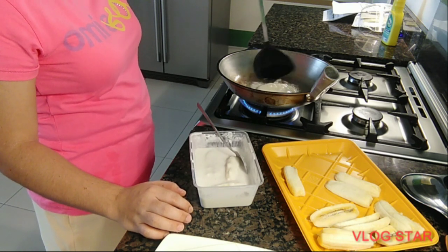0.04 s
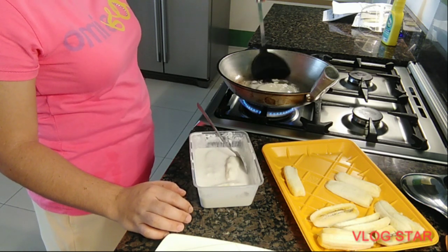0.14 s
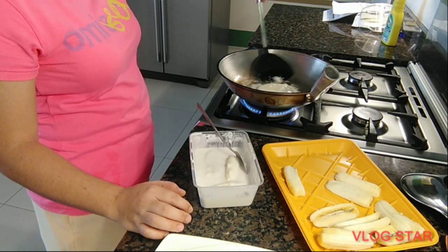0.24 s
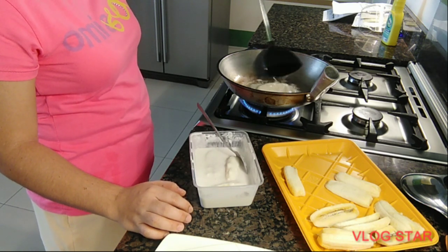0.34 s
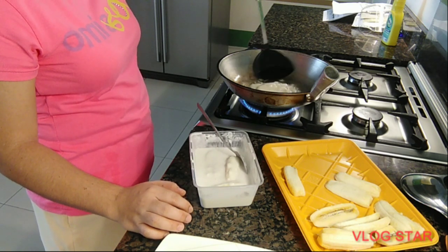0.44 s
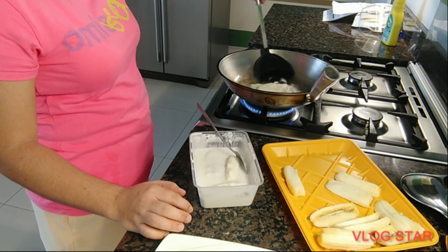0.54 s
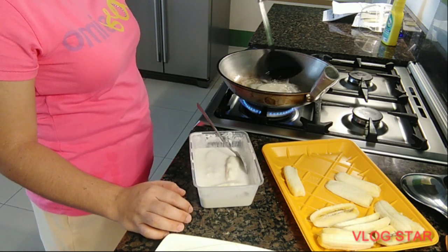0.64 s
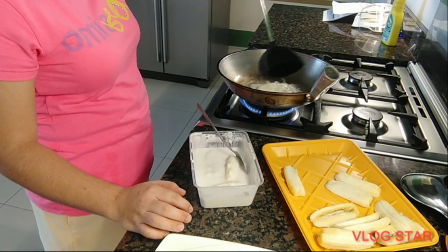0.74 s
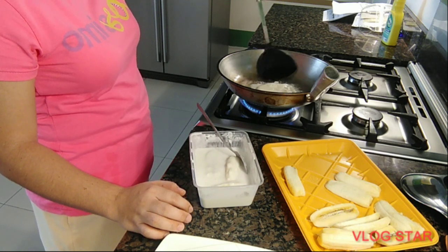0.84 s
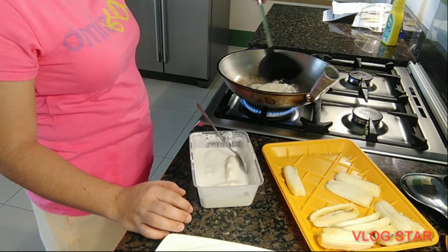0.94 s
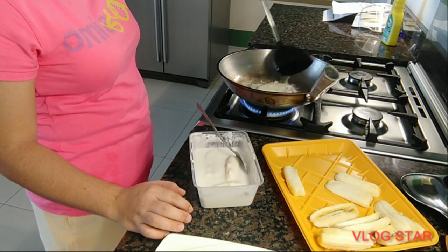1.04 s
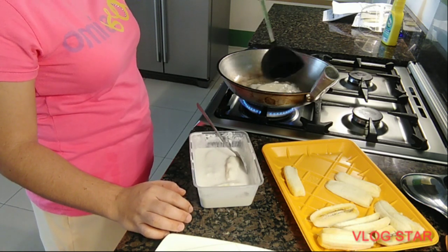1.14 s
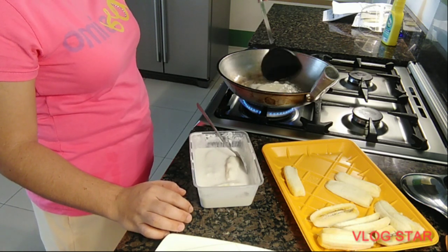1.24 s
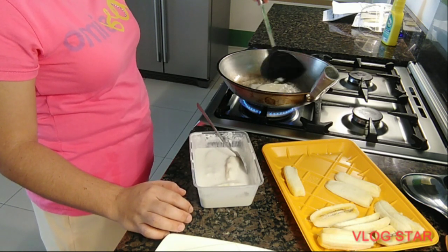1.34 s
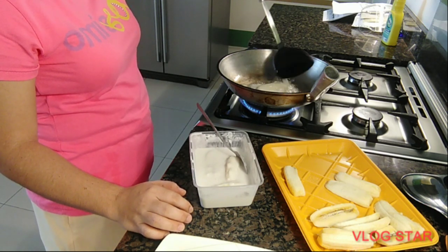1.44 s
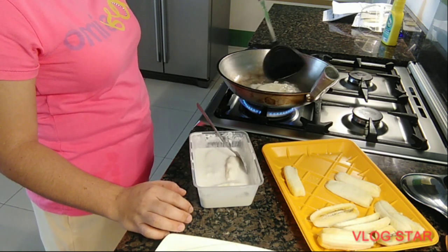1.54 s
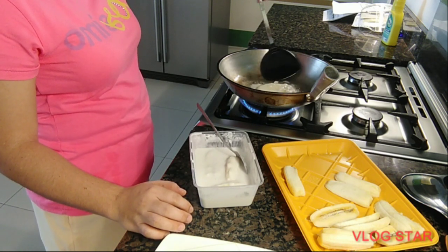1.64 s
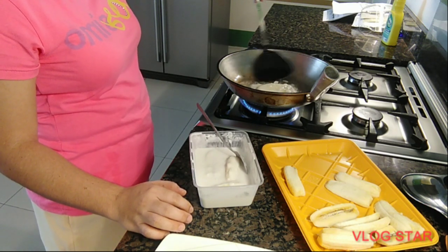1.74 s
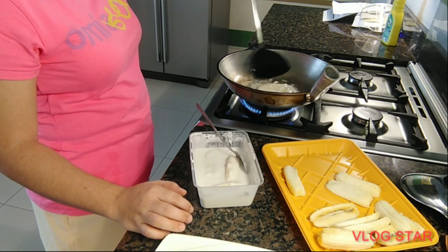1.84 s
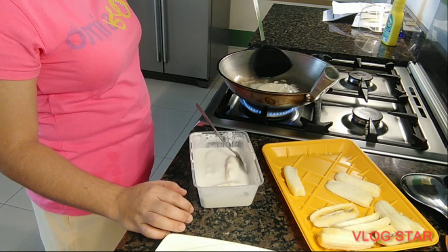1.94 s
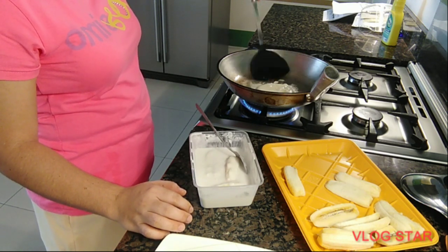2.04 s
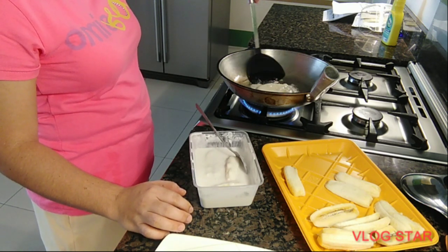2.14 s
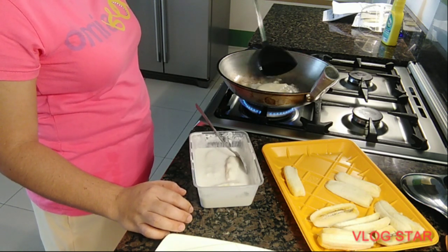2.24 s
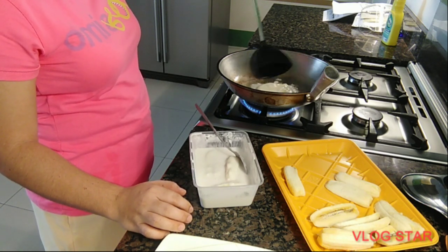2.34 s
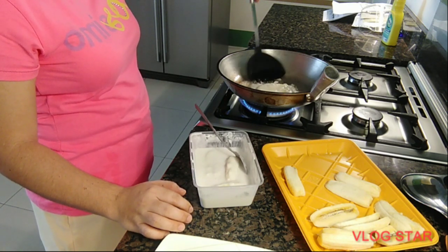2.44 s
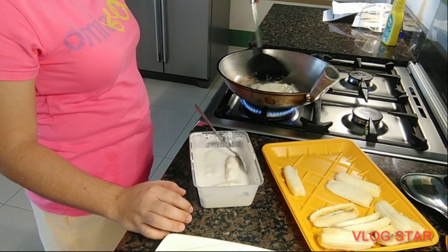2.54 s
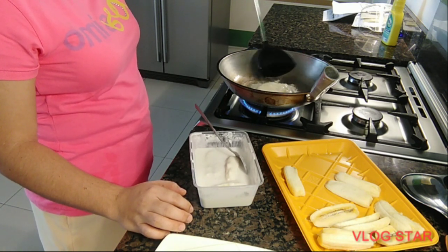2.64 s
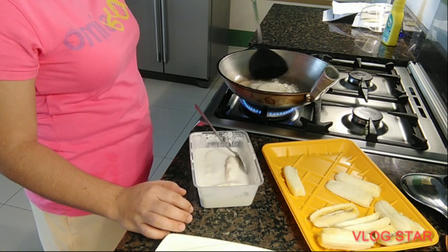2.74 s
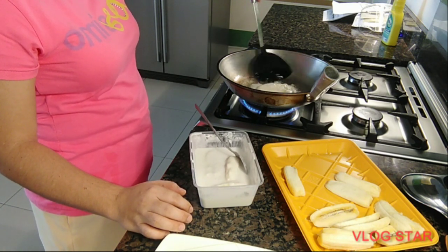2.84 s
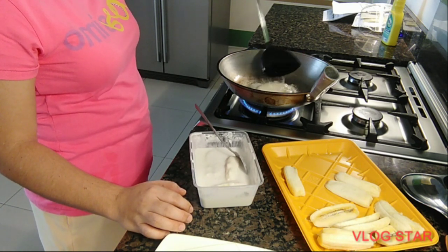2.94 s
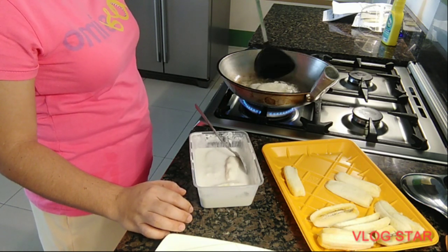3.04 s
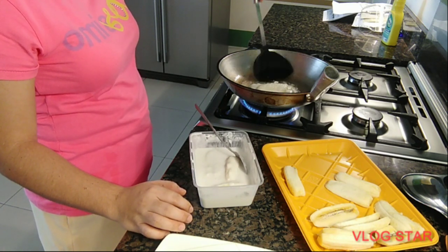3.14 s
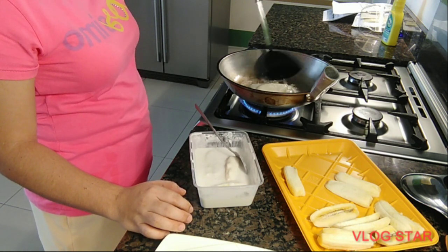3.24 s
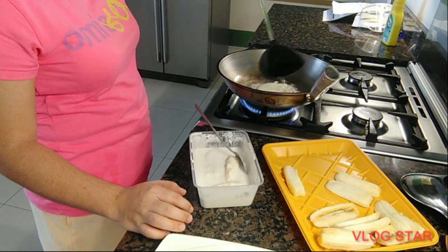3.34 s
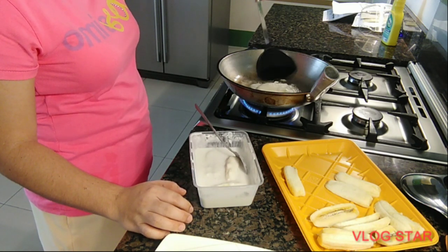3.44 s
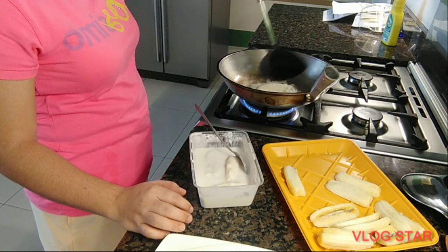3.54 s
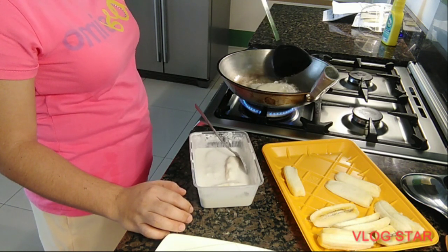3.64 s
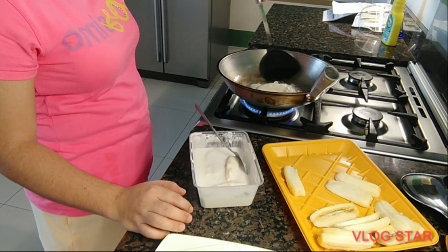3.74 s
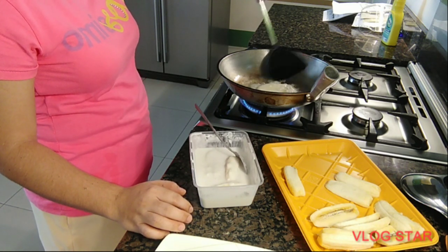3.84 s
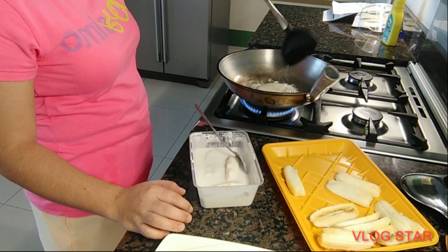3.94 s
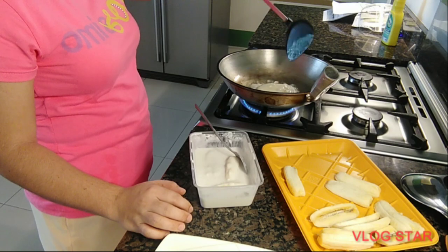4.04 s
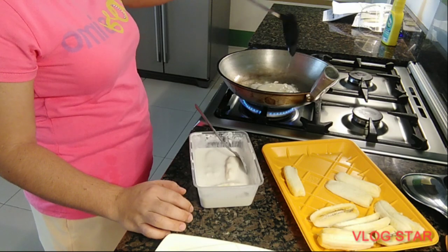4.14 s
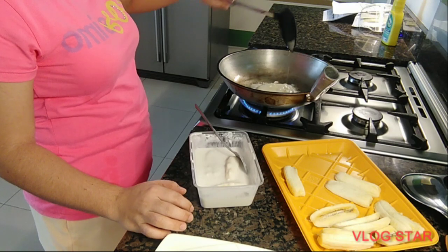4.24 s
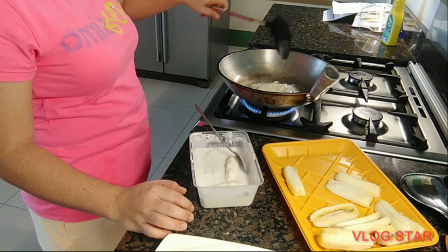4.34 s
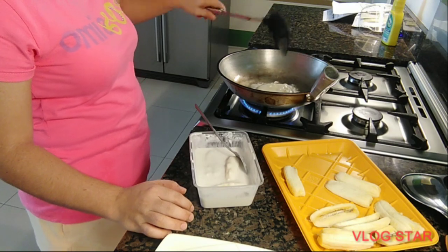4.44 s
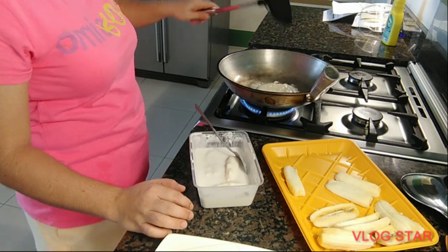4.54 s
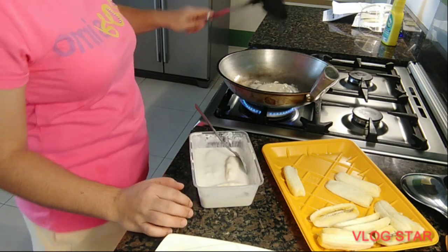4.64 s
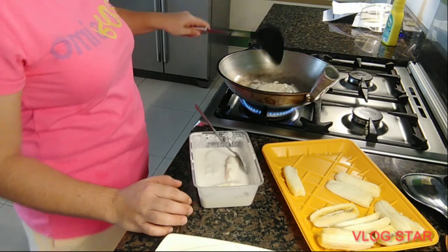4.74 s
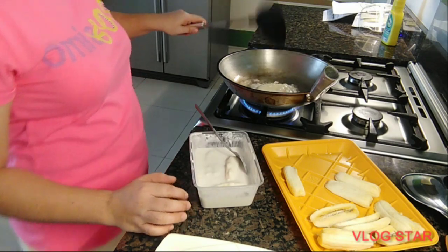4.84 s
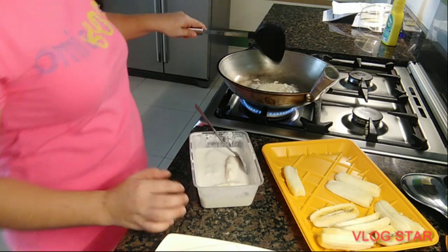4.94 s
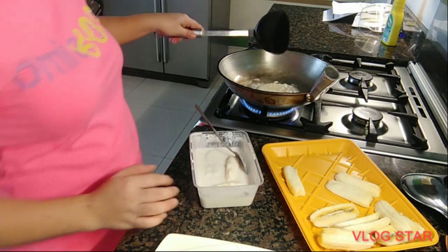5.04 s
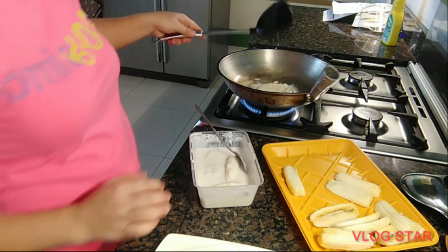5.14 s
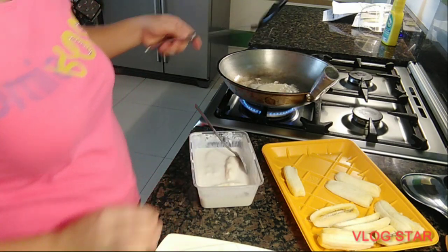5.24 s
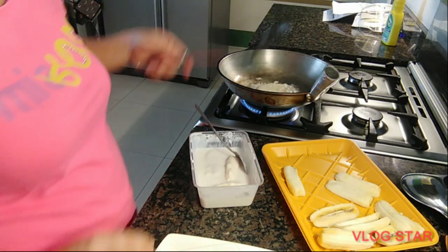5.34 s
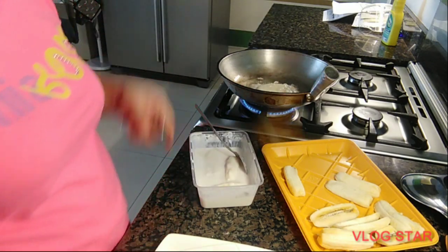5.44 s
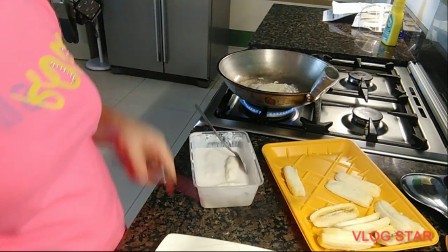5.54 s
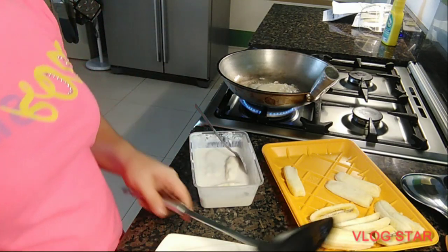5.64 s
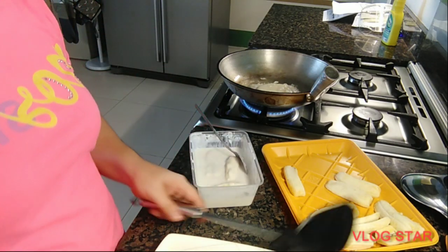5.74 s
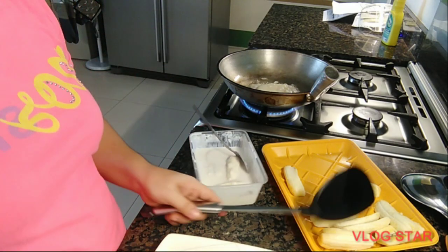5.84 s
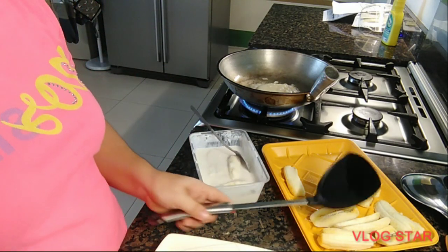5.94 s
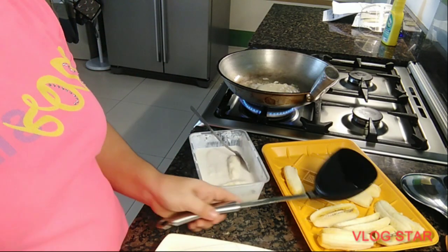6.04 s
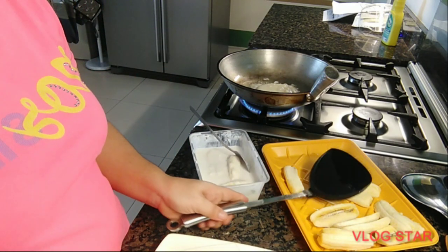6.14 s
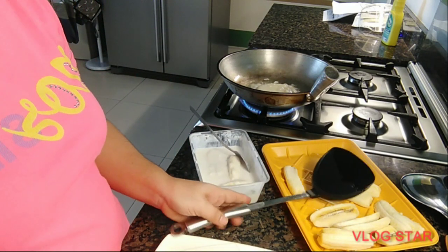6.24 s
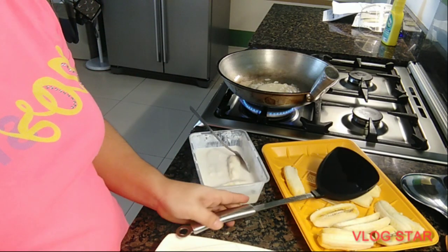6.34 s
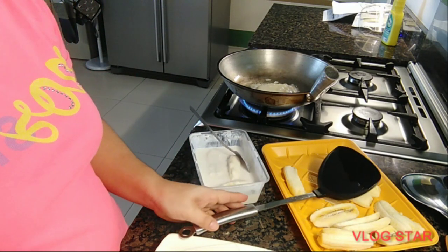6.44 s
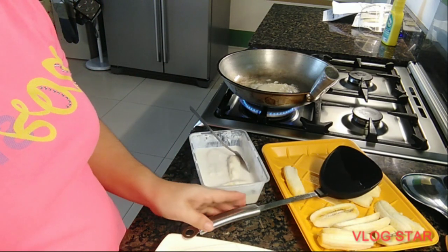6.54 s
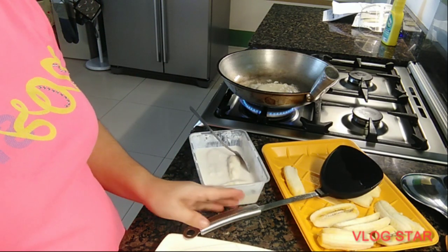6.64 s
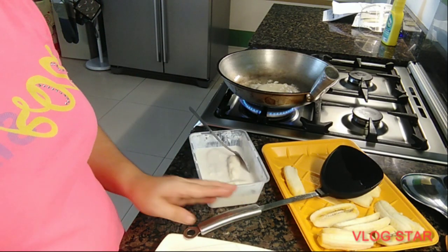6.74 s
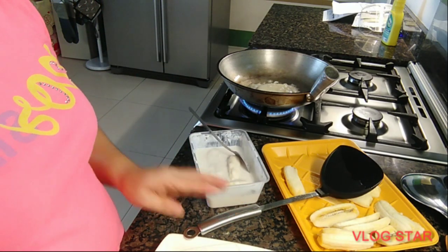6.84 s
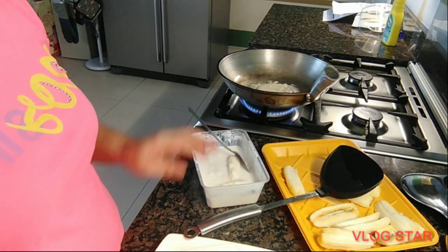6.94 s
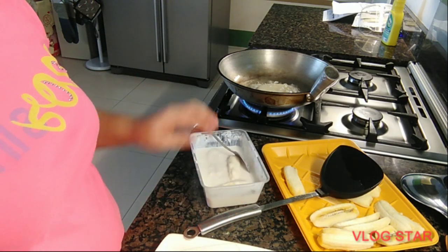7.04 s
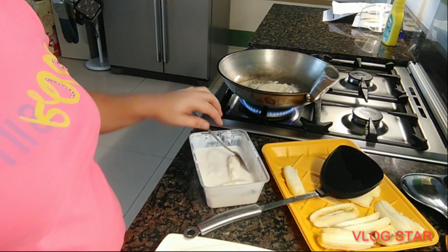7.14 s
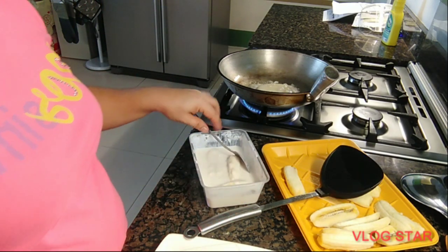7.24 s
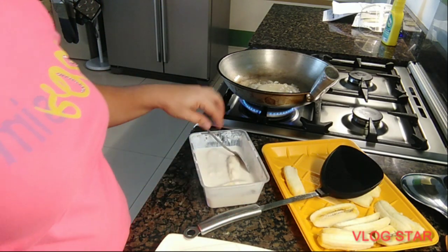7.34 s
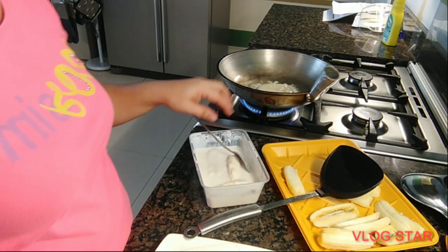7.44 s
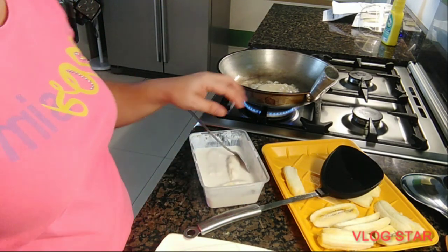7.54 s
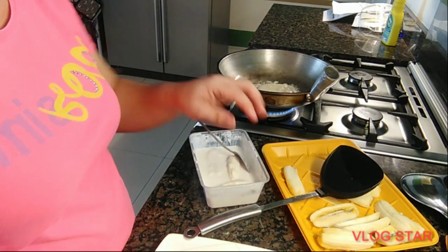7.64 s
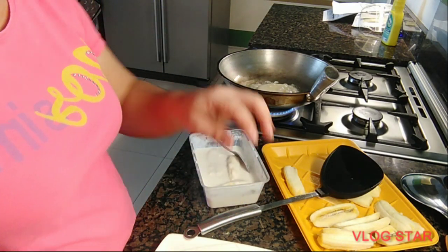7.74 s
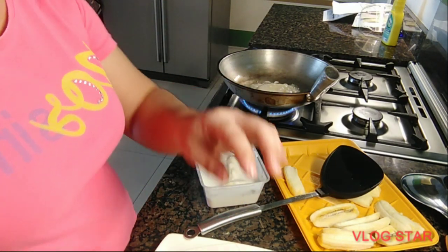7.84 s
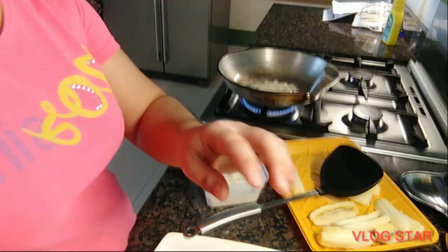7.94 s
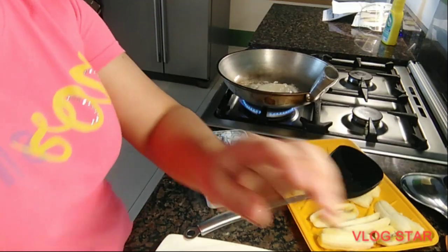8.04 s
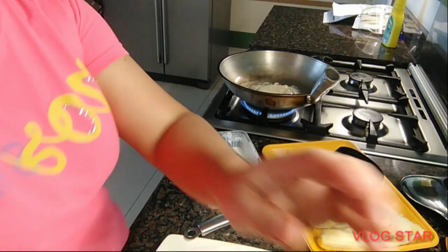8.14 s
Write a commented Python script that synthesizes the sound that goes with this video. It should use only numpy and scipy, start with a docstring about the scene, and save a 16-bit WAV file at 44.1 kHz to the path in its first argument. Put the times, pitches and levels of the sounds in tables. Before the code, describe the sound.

One microphone in a small, hard-surfaced kitchen hears battered food frying in a wok. From 0 to about 1.2 seconds bright, dense sizzling surges in quick splashes, strongest near 0.2 and 0.6, with coarse bubbling and a light wok tap at 0.3. Until 2.3 the sizzle is steadier, dotted with short, pitched bubble pops, a sharp one near 1.9, and dry snaps. A fresh surge comes at 2.4, then steel knocks with a brief scrape at 2.6 and a stronger ringing knock at 2.95. After 4 seconds the frying falls to a thinner, calmer hiss with sparse pops and snaps. At 6.3 a metal handle lightly touches stone, then clatters loudly and closely in rapid bounces from 6.45 to 6.6, ringing briefly. The sizzle continues, rising slightly towards a faint last knock at 8.1. Soft gurgling, a fluttering flame and low electrical hum lie beneath.

```python
"""Battered fritters fry in a wok on a gas burner in a small tiled kitchen, heard by one microphone.
From the start, random steam bursts make the sizzle, which surges in splashes as a spatula bastes the food;
large bubbles ring as damped cavities, water drops snap, and struck wok modes ring under the spatula until 3 s.
The frying then calms; after 6 s the spatula is laid down and its steel handle bounces on the stone counter.
Near the end comes a last faint knock. Gurgling, a fluttering gas flame and a steady mains hum lie below."""
import sys
import numpy as np
from scipy import signal
from scipy.fft import rfft, irfft
from scipy.io import wavfile
from scipy.ndimage import uniform_filter1d

SR = 44100
rng = np.random.default_rng(int(sys.argv[2]) if len(sys.argv) > 2 else 0)


def digitize_waveform(pressure):
    """Quantize a signal to 16-bit integers and store it at the path in sys.argv[1].

    Rows of a 2-D input are taken as channels; values are limited to [-1, 1].
    """
    field = np.atleast_2d(pressure).T
    bounded = np.clip(field, -1, 1)
    quanta = np.round(bounded * 32767).astype(np.int16)
    wavfile.write(sys.argv[1], SR, quanta)


N = 361619
TIME = np.arange(N) / SR
SHOT = TIME[:2 * SR // 3]  # time within one blow, s

# spectrum of the fine sizzle, also of the spit from a bursting bubble: f/Hz, relative level/dB
SIZZLE_COLOUR = [(600, -32), (1950, -33.5), (2200, -11), (2650, -4.5), (3600, -4.5), (4500, 0), (5500, -3),
                 (6800, -3), (8100, 4.5), (9000, -1), (10000, -8), (12300, -15.5), (14000, -20.5),
                 (16000, -25)]
# spectrum of the coarse bubbling: f/Hz, relative level/dB
BUBBLING_COLOUR = [(60, -25), (250, -24), (450, -15.5), (980, -18), (1250, 0), (1600, 12), (2400, 2.5),
                   (4000, 4), (7000, -11.5), (14000, -43)]


def frying(spray_db=-28.5):
    """Shot noise: steam bursts at random instants fuse into a hiss, coarser ones into bubbling."""
    fine_db, coarse_db = activity()
    surge_db = fine_db - np.mean(fine_db)

    fizz_clicks = bursts(per_s=4000, spread_db=4.5)
    fizz = colour(over_the_oil(fizz_clicks, count=5), SIZZLE_COLOUR)
    fizz_db = fine_db + 0.16 * walk(14)

    # hot oil running over wet batter adds a finer, brighter spray
    spray_clicks = bursts(per_s=3300, spread_db=0.5)
    spray = colour(spray_clicks, [(1500, -39), (3000, -1), (9500, 16.5), (16000, -16)])
    spray_level_db = fine_db + 0.85 * surge_db + spray_db

    bubbling_clicks = bursts(per_s=1500, spread_db=4.0)
    bubbling = colour(over_the_oil(bubbling_clicks, count=2), BUBBLING_COLOUR)
    bubbling_db = coarse_db + 1.6 * walk(16)

    return (level(fizz) * undb(fizz_db)
            + level(spray) * undb(spray_level_db)
            + level(bubbling) * undb(bubbling_db))


# slow course of the frying, before gain: t/s, sizzle level/dB, coarse bubbling level/dB
FRYING = [(0.0, -43, -55.5), (1.5, -45.5, -57), (2.07, -45.5, -70.5), (2.35, -43.7, -56.5),
          (2.85, -41, -52), (3.45, -44, -59), (3.95, -44, -70.5), (4.35, -48.5, -72), (5.1, -49, -79.5),
          (6.15, -48.5, -75), (7.1, -48.5, -73), (7.7, -48, -69), (8.19, -47, -62.5)]
# hot oil washes over the batter: t of the crest/s, sizzle level/dB, coarse bubbling level/dB
SPLASHES = [(0.19, -37.5, -57), (0.34, -49, -49.5), (0.56, -36, -47.5), (0.89, -43, -54), (1.05, -50, -45),
            (2.42, -35, -51.5), (5.46, -47.5, -85)]


def activity(sizzle_db=0.28, bubbling_db=1, rise_s=0.063, fall_s=0.11):
    """Power addition: each splash's surge adds its energy to the slow course; returns two levels in dB."""
    s, fine, coarse = np.transpose(FRYING)
    fine = undb(np.interp(TIME, s, fine) + sizzle_db)
    coarse = undb(np.interp(TIME, s, coarse) + bubbling_db)
    for crest_s, fine_db, coarse_db in SPLASHES:
        age = TIME - crest_s
        # the surge swells, then dies away as the water boils off
        surge = np.exp(-np.where(age < 0, (age / rise_s) ** 2, age / fall_s))
        fine = np.hypot(fine, undb(fine_db) * surge)
        coarse = np.hypot(coarse, undb(coarse_db) * surge)
    return 20 * np.log10(fine), 20 * np.log10(coarse)


# big steam bubbles: t/s, onset level before gain/dB, f/Hz, ringing/cycles to -60 dB (at least 2),
# spit level relative to the cavity/dB
POPS = [(.0074, -25.5, 7400, 29, -25), (0.669, -32, 2240, 6, -15), (0.8107, -19, 3510, 14, -17),
        (1.023, -28.5, 1630, 24, -6), (1.2365, -30, 7800, 34, -21), (1.2637, -26.5, 5130, 23, -2),
        (1.4392, -29.5, 1700, 10, -12), (1.549, -25.5, 3560, 4.3, -32), (1.6522, -18.5, 4140, 30, -11),
        (1.677, -22, 8500, 14, 5), (1.761, -21.5, 5080, 11, -19), (1.806, -33, 2200, 12, -26),
        (1.852, -23, 8600, 10, -10), (1.8856, -13, 4300, 37, -3.5), (2.2, -32, 2080, 8, -15),
        (2.3696, -23.5, 8500, 12, -14), (2.629, -20, 4340, 9.7, -18), (2.793, -20, 2800, 16, -32),
        (2.9027, -19.5, 4400, 9, -15), (3.271, -28.5, 6080, 29, 2), (3.6158, -32, 2140, 9.3, -30),
        (4.0763, -28.5, 7300, 14, -1), (4.144, -24.5, 5370, 21, -10), (5.843, -24, 6140, 28, -18),
        (5.9628, -24, 7970, 68, -29), (8.1721, -23.5, 6060, 18, -6)]


def pops(gain_db=-9):
    """Cavity resonance: big bursting bubbles stand out of the sizzle with a pitch."""
    out = np.zeros(N)
    for s, db, hz, cycles, spit_db in POPS:
        add(out, s, struck(pop(hz, cycles, spit_db), db + gain_db))
    return out


def pop(hz, cycles, spit_db, overtone=1.76, overtone_db=-17.5, tail_db=-16, tail_t60_s=0.05):
    """Damped resonance: a bursting bubble rings its cavity for a few cycles and throws a spit of oil."""
    phase = 2 * np.pi * hz * SHOT
    # the second resonance lies an inharmonic ratio above the first
    tones = np.sin(phase) + undb(overtone_db) * np.sin(overtone * phase)
    cavity = unit(fade(max(cycles, 2) / hz) * tones)
    tail = undb(tail_db) * unit(fade(tail_t60_s) * np.sin(phase))  # the pitch lingers faintly
    spit = unit(colour(noise_burst(t60=0.012), SIZZLE_COLOUR))
    burst = cavity + tail + undb(spit_db) * spit
    # so small an opening radiates little bass
    radiation = [(600, -38.5), (1500, -7.0), (3000, 7.0), (9000, 9.5), (12000, -1.5)]
    return kitchen(colour(burst, radiation))


def small_pops(high_db=-3.5, low_db=3.0, scatter_db=7.0, cycles=16, spit_db=-18, count=30):
    """Random cavity resonances: high bubbles follow the sizzle's level, low ones the bubbling's."""
    lowest_hz, highest_hz = 1500, 8000
    fine_db, coarse_db = activity()
    out = np.zeros(N)
    for when, height, size in rng.random((count, 3)):
        i = int(when * N)
        hz = lowest_hz * (highest_hz / lowest_hz) ** height
        db = height * (fine_db[i] + high_db) + (1 - height) * (coarse_db[i] + low_db)
        db = db + scatter_db * (2 * size - 1)
        add(out, TIME[i], struck(pop(hz, cycles, spit_db), db))
    return out


# water drops in the oil: t/s, onset level before gain/dB, treble tilt/(dB per octave)
SPITS = [(0.375, -21, 6), (0.9932, -20.5, -4), (2.0325, -24, 2), (2.2317, -20, 4), (2.3442, -25, 11),
         (4.689, -29, 1), (5.638, -25.5, 5.5), (5.783, -24.5, 10), (7.5462, -24.5, 1), (7.556, -25, 10),
         (7.644, -23, 8)]


def spits(gain_db=-13.5):
    """Impulsive radiation: water drops flash to steam with a dry snap."""
    snap_colour = [(20, -71), (400, -30), (1300, -24), (2800, 9.0), (8500, 11.5), (11000, -2.0), (16000, -22)]
    out = np.zeros(N)
    for s, db, tilt_db in SPITS:
        snap = colour(blow(t60=0.017, click_db=4.0), snap_colour, tilt_db)
        add(out, s, struck(kitchen(snap, wet_db=2.5), db + gain_db))
    return out


# spatula on the wok: t/s, onset level before gain/dB, ring level before ring gain/dB,
# treble tilt/(dB per octave), contact t60/s (short for a tap, long for a scrape)
KNOCKS = [(0.2785, -18, -12, -2, 0.051), (2.594, -10, -12, 0.2, 0.028), (2.626, -22, -15, 3.5, 0.37),
          (2.947, -8.5, -0.5, -3, 0.029), (8.090, -25, -23, 0.75, 0.052)]
# natural modes of the wok's steel: f/Hz, mean relative level/dB, t60/s
WOK_MODES = [(289, -5, 0.59), (402, -8.5, 0.95), (463, -14, 1), (543, -11, 1.0), (780, -20, 0.42),
             (1006, -8.5, 0.37), (1226, 0.5, 0.31), (1570, -6, 0.99), (1620, 12, 0.3), (1680, -5.5, 0.34),
             (1860, -7, 0.91), (2196, -0.5, 0.82), (2370, -4.5, 0.75), (3070, -17, 0.45), (3620, 3, 0.3),
             (3650, -5, 0.2), (4269, -1, .4), (4740, -4, 0.2), (4820, 2, .45), (5346, -3, .45),
             (7030, -6, 0.35)]
# spectrum of the contact: f/Hz, relative level/dB
KNOCK_COLOUR = [(30, -57), (100, -13), (300, -10.5), (850, -15.5), (1280, 8.5), (2100, 0), (4000, 3),
                (8000, 6.5), (11000, -11.5), (16000, -42)]


def knocks(gain_db=-11.5, ring_db=0.5):
    """Modal excitation: the spatula cracks or scrapes against the wok, whose steel rings on."""
    out = np.zeros(N)
    for s, db, steel_db, tilt_db, contact_s in KNOCKS:
        contact = blow(t60=contact_s, click_db=-13.5)
        crack = unit(colour(kitchen(contact) + 0.65 * contact, KNOCK_COLOUR, tilt_db))
        steel = undb(ring_db + steel_db) * ring(WOK_MODES, scatter_db=3.5)
        add(out, s, struck(crack + steel, db + gain_db))
    return out


# steel handle on the counter: t/s, onset level before gain/dB, treble tilt/(dB per octave),
# ring level relative to the crack/dB
CLATTER = [(6.3288, -15.5, 0, -34), (6.357, -28.5, 5, -28), (6.4071, -20.5, -0.5, -28),
           (6.4474, -2.5, 0, -7.5), (6.479, -10.5, -1.5, -18.5), (6.5176, -3, 0, -11.5),
           (6.548, -11.5, -0.5, -7.5), (6.581, -1.5, 1.5, -3.5), (6.618, -6.5, -.7, -16)]
# natural modes of the spatula's handle and blade: f/Hz, mean relative level/dB, t60/s
HANDLE_MODES = [(285, -9.5, 0.3), (335, -12, 0.25), (816, -9.5, 0.35), (913, -0.5, 0.33), (944, 3, 0.24),
                (1580, -17, .28), (1680, -26, 0.27), (2206, -5, 0.26), (2554, -7.5, 0.4),
                (2690, -10.5, 0.31), (3560, -15, 0.42), (3670, -5, 0.2), (5300, -16, 0.13),
                (5750, -18, 0.34), (7800, -17.5, .35), (8400, -11.5, 0.29)]
# spectrum of the contact: f/Hz, relative level/dB
CLATTER_COLOUR = [(30, -63), (140, -46.5), (290, -10.5), (430, -9), (680, -14.5), (960, 2), (1120, -7),
                  (1430, 1.5), (1950, -6.5), (2550, -1.5), (3200, -5.5), (4700, -4.5), (8000, -4),
                  (10500, -17.5), (16000, -33.5)]


def clatter(gain_db=-10.0, direct_db=2):
    """Repeated impact: the handle touches the stone, drops and bounces; strong direct sound puts it close."""
    out = np.zeros(N)
    for s, db, tilt_db, ring_db in CLATTER:
        contact = blow(t60=0.033, click_db=-11.0)
        near_contact = kitchen(contact, wet_db=-3.5) + undb(direct_db) * contact
        crack = unit(colour(near_contact, CLATTER_COLOUR, tilt_db))
        handle = undb(ring_db) * ring(HANDLE_MODES, scatter_db=1.5)
        add(out, s, struck(crack + handle, db + gain_db))
    return out


# large slow bubbles in the wok, by band: centre f/Hz, spread of f/Hz, rms level before stirring/dB
GURGLE = [(428.6, 90, -79.5), (638, 44.4, -69), (1282.3, 48.3, -64)]


def gurgle(follow=0.47, scatter_db=4.0, cluster_db=3.5, count=400):
    """Random superposition: overlapping large bubbles blur into a burble, louder while the oil is stirred."""
    _, coarse_db = activity()
    stir = undb(follow * (coarse_db - np.mean(coarse_db)))
    total = 0
    for hz, spread_hz, db in GURGLE:
        out = np.zeros(N)
        for k, (when, pitch, size, length) in enumerate(rng.standard_normal((count, 4))):
            bubble = blip(hz + spread_hz * pitch, .028 * 2 ** (length / 3), glide=.02)
            add(out, (k + when) / count * TIME[-1], bubble * undb(scatter_db * size))
        clusters = undb(cluster_db * walk(9))
        total = total + level(out * clusters, db)
    # the room colours the burble without changing its level
    return stir * level(kitchen(total, wet_db=-6.5)) * np.std(total)


# soft hollow bumps around the stove: t/s, peak level before the wobble/dB, f/Hz
BUMPS = [(2.631, -41, 296), (2.695, -46.5, 280), (2.795, -48, 294), (2.96, -48.5, 109), (3.36, -60, 113),
         (5.79, -59, 120)]


def bumps(wobble_db=5.5, cycles=24):
    """Amplitude modulation: dull bumps wobble and have no sharp edge; lower ones last longer."""
    out = np.zeros(N)
    for s, db, hz in BUMPS:
        add(out, s, undb(db) * blip(hz, cycles / hz))
    return out * undb(wobble_db * walk(70))


# mains hum: f/Hz, rms level/dB
HUM = [(59, -68), (118, -78)]
# spectrum of the gas flame: f/Hz, relative level/dB
FLAME_COLOUR = [(20, -28), (42, -8), (100, -1), (170, -13), (290, -3.5), (450, -21), (900, -11),
                (1700, -28), (4000, -29)]


def background(flame_db=-70):
    """Broadband noise and steady tones: the gas flame flutters softly over a mains hum."""
    flame = level(colour(rng.standard_normal(N), FLAME_COLOUR), flame_db)
    flutter = undb(2.0 * walk(9))
    hum = sum(level(np.sin(2 * np.pi * hz * TIME), db) for hz, db in HUM)
    return flame * flutter + hum


def kitchen(x, wet_db=0):
    """Room response: direct sound, a cluster of echoes from wok, hob and counter, then the tiled room."""
    near_t60_s, near_db = 0.077, 8.5
    room_t60_s, tail_db = 0.62, 3.5
    near = unit(noise_burst(near_t60_s) * (SHOT > .0008))
    build_up = 1 - np.exp(-SHOT / 0.013)
    tail_colour = [(300, 6), (4500, 3), (9000, -0.5), (16000, -0.5)]
    tail = colour(noise_burst(room_t60_s) * build_up, tail_colour)
    response = undb(near_db) * near + undb(tail_db + wet_db) * tail
    return x + signal.fftconvolve(x, response)[:len(x)]


def over_the_oil(clicks, count=8):
    """Spatial spread: each burst comes from one of several spots in the wok, each with its own echoes."""
    spot = rng.integers(count, size=N)
    return sum(kitchen(clicks * (spot == k)) for k in range(count))


def ring(modes, scatter_db, split_hz=9):
    """Modal beating: modes ring in close pairs; every blow shares its energy a little differently."""
    out = 0
    for hz, db, t60 in modes:
        size, split, side = rng.standard_normal(3)
        first = np.cos(2 * np.pi * hz * SHOT)
        second = 0.62 * np.sin(2 * np.pi * (hz + split_hz * split) * SHOT)
        gain = np.sign(side) * undb(db + scatter_db * size)
        out = out + gain * fade(t60) * (first + second)
    return unit(out)


def blow(t60, click_db):
    """Contact excitation: one hard click, then a brief crunch."""
    return unit(noise_burst(t60) + undb(click_db) * (SHOT == 0))


def blip(hz, length_s, glide=0.063):
    """Frequency glide: a soft tone swells, rises a little in pitch and dies."""
    t = np.arange(int(length_s * SR)) / SR
    age = t / length_s
    envelope = np.sin(np.pi * age ** 0.59) ** 2
    return envelope * np.sin(2 * np.pi * hz * t * (1 + glide * (age - 1) / 2))


def bursts(per_s, spread_db):
    """Poisson-like process: clicks at random instants, many small and a few large, at unit rms."""
    chance = rng.random(N)
    size = np.minimum(rng.exponential(size=N), 5)
    return level((chance < per_s / SR) * undb(spread_db * size))


def walk(rate):
    """Smoothed random process: a slow wander with a spread near 1; rate in steps per second."""
    k = int(SR / rate)
    steps = np.repeat(rng.standard_normal(N // k + 1), k)
    return level(uniform_filter1d(steps, k)[:N])


def noise_burst(t60):
    """Decaying noise of unit energy."""
    return unit(rng.standard_normal(len(SHOT)) * fade(t60))


def fade(t60):
    """Exponential decay: the level of one blow falls 60 dB in t60 seconds."""
    return np.exp(-np.log(1000) * SHOT / t60)


def colour(x, points, tilt_db=0, size=4096):
    """Minimum-phase filtering through (f/Hz, level/dB) points, tilted per octave above 500 Hz."""
    hz, db = np.transpose(points)
    octave = np.log2(np.maximum(np.fft.rfftfreq(size, 1 / SR), 1))
    tilt = tilt_db * np.maximum(octave - np.log2(500), 0)
    gain = undb(np.interp(octave, np.log2(hz), db) + tilt)
    # folding the cepstrum onto positive times makes the filter causal
    cepstrum = irfft(np.log(gain))
    cepstrum[1:size // 2] *= 2
    cepstrum[size // 2 + 1:] = 0
    return signal.oaconvolve(x, irfft(np.exp(rfft(cepstrum))))[:len(x)]


def struck(sound, db, size=512):
    """Onset level: scale a blow so that its first milliseconds have this rms level."""
    return sound * undb(db) / np.std(sound[:size])


def undb(db):
    """Logarithmic scale: decibels to amplitude gain."""
    return 10 ** (np.asarray(db) / 20)


def level(x, db=0):
    """Effective value: set the rms level."""
    return x * undb(db) / np.sqrt(np.mean(x ** 2))


def unit(x):
    """Energy normalisation: scale to a unit sum of squares."""
    return x / np.sqrt(np.sum(x ** 2))


def add(out, s, sound):
    """Superposition: mix in a sound that starts at s seconds."""
    i = int(np.clip(s * SR, 0, N - 1))
    out[i:i + len(sound)] += sound[:N - i]


def scene():
    """Superposition of all sources at one microphone, the same on both channels."""
    oil = frying() + gurgle() + pops() + small_pops() + spits()
    utensils = knocks() + clatter() + bumps()
    mono = oil + utensils + background()
    return np.array([mono, mono])


def record(dry, top_hz=15900):
    """Hard limit and low-pass: peaks are held below full scale and nothing sounds above top_hz."""
    limited = np.clip(dry, -.87, .87)
    low_pass = signal.ellip(10, .1, 80, top_hz, fs=SR, output="sos")
    return signal.sosfilt(low_pass, limited)


dry = scene()
out = record(dry)
digitize_waveform(out)
```